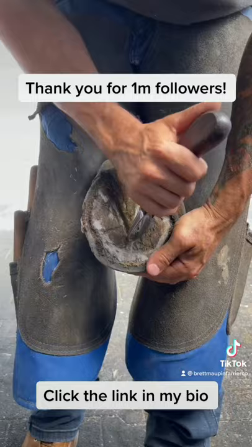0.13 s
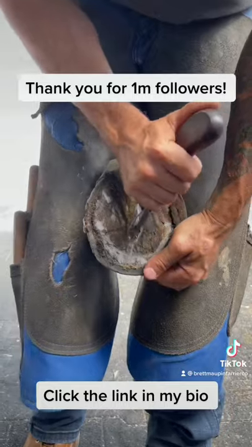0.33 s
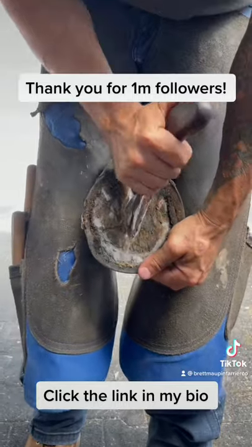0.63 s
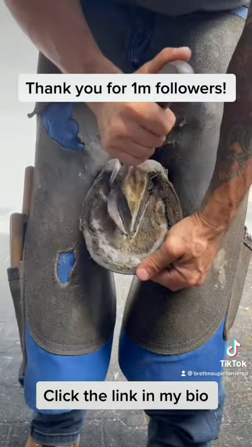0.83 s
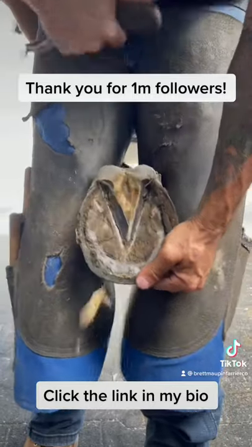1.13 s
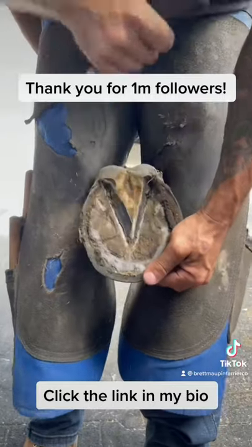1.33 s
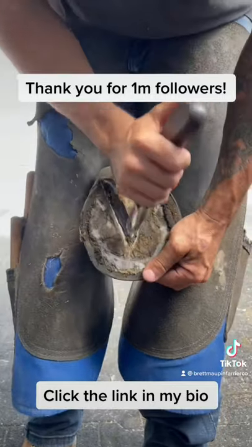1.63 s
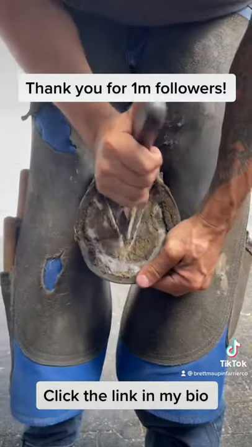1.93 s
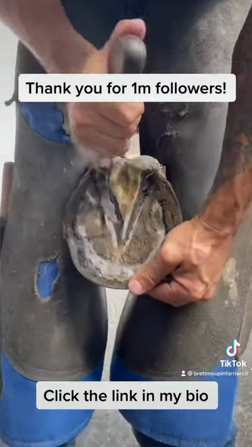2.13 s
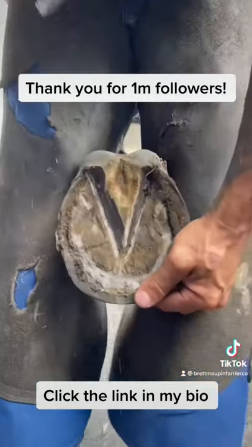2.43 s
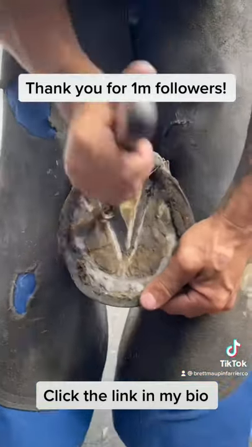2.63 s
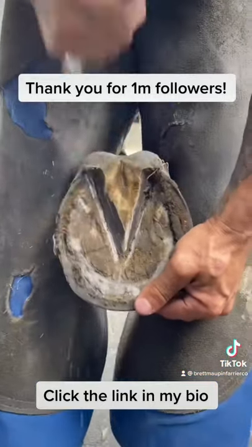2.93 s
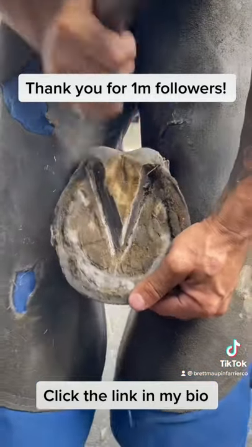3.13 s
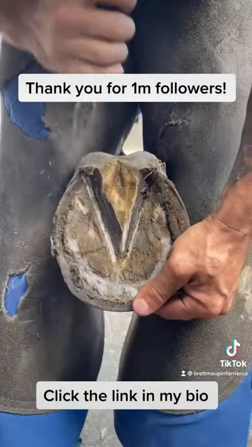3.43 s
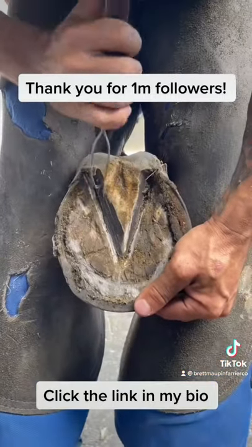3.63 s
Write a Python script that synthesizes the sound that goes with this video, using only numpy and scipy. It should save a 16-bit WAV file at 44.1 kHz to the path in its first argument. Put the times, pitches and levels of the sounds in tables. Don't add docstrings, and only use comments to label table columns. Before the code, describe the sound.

A hoof knife scrapes lightly, then two loud snaps, a pause with a few taps and cloth rustle, then more strokes ending in cracks, over a low hum; close, dry stereo microphone.

```python
import sys
import numpy as np
from scipy import signal
from scipy.fft import rfft, irfft, next_fast_len
from scipy.io import wavfile

SR = 44100
rng = np.random.default_rng(int(sys.argv[2]) if len(sys.argv) > 2 else 0)


def persist_wave(psi):
    counts = np.round(np.clip(psi, -1, 1) * 32767).astype(np.int16)
    wavfile.write(sys.argv[1], SR, np.atleast_2d(counts).T)


def invert_db(x):
    u = np.asarray(x, float) / 20
    return 10 ** u


N = 166257

# (time [s], frequency [Hz], level [dB])
MOTOR_TONE = [(0.0, 68, -53), (0.05, 69.5, -50), (0.72, 70.7, -39), (0.85, 69.9, -47.5),
              (1.12, 72.7, -47.5), (1.5, 70.76, -42.5), (2.34, 70.6, -43.5), (2.47, 71.1, -41),
              (2.48, 71.3, -49), (2.71, 70.45, -38.5), (2.89, 73.06, -62), (3.07, 72.2, -36),
              (3.38, 70.65, -50), (3.59, 71.05, -43.5), (3.77, 67.9, -43)]
# (frequency [Hz], width [Hz], level [dB])
MOTOR_BANDS = [(46, 27, -54.5), (78.4, 7.4, -54.5), (95.3, 7.6, -50), (121.4, 4.2, -55.5), (188.5, 7, -58),
               (285, 4.8, -63), (383.4, 8.3, -70.5)]
# (frequency [Hz], density [dB])
FLOOR_SPECTRUM = [(15, -32), (25, -7.5), (54, -1.5), (86, -2), (196, -12), (237, -14), (4000, -38.5),
                  (5200, -41), (8800, -120)]
# (frequency [Hz], density [dB])
HISS_SPECTRUM = [(2000, -2.5), (4000, -7.5), (7000, -2), (10500, 3.5), (11500, -3.5), (12500, -47),
                 (14000, -4)]
FLOOR_DB, HISS_DB = -46.5, -64.5
APART_DB, APART_HZ = -68.5, (162, 1410)

# (start [s], length [s], level [dB])
RUSTLES = [(0.644, 0.086, -53.5), (0.79, 0.069, -53), (0.876, 0.11, -48.5), (1.043, 0.039, -55),
           (1.149, 0.12, -52.5), (1.333, 0.15, -57), (1.829, 0.023, -58), (2.13, 0.081, -49.5),
           (2.237, 0.053, -52), (2.755, 0.027, -55), (2.903, 0.19, -55), (3.162, 0.092, -59.5),
           (3.222, 0.17, -58), (3.49, 0.072, -54)]
# (frequency [Hz], density [dB])
CLOTH_SPECTRUM = [(600, 3), (2000, -1.5), (5000, -2.5), (8000, 5), (10500, 7.5), (12000, -1), (13500, -20),
                  (16000, -46)]
RUSTLE_RISE_S, RUSTLE_FALL_S = 0.035, 0.036

# (time [s], peak level [dB], pitch [Hz], decay [cycles])
TAPS = [(.774, -29.5, 680, 15), (1.0156, -24.5, 1150, 25), (1.017, -38, 546, 8.9), (1.0708, -34.5, 1970, 5),
        (1.079, -31, 448, 13.3), (1.36, -37.5, 439, 14), (1.735, -42, 307, 10), (1.046, -34, 700, 10),
        (2.2438, -30, 702, 21), (2.2442, -27, 1127, 23), (2.255, -32, 620, 14), (2.28, -38, 960, 16),
        (2.284, -35, 375, 6.4), (2.303, -39, 766, 22), (2.633, -28, 337, 14), (2.6327, -29, 420, 13),
        (2.685, -24, 1360, 4.8), (2.764, -32.5, 336, 4.9), (2.819, -26, 604.6, 1.9),
        (3.055, -27.5, 433, 4.1), (3.191, -26, 674, 6.3)]
TAP_SOFTNESS = 1.82

# (time [s], frequency [Hz], level [dB], t60 [s])
BLADE_MODES = [
    (.15, 10200, -54.5, 0.085),
    (1.066, 2350, -56.5, 0.21),
    (1.075, 5160, -62.5, 0.1),
    (1.41, 4700, -65, 0.29),
    (1.41, 12950, -59, 0.31),
    (2.29, 5460, -62, .12),
    (2.75, 10470, -46, 0.1),
    (3.148, 5190, -49.5, 0.19),
    (3.139, 10000, -31, 0.031),
    (3.15, 11100, -64, 0.13),
]
SING_RISE_S = 0.012

# (time [s], peak level [dB], pitch [Hz], decay [cycles])
NICKS = [(0.2027, -34.5, 2700, 38), (.2611, -50, 2800, 50), (0.31, -40, 2600, 56), (0.327, -51, 2450, 36),
         (0.3724, -57, 2220, 40), (0.6263, -55, 2540, 40), (.7071, -54, 2170, 55), (0.7728, -26, 2350, 17),
         (.9942, -24.5, 5760, 59), (1.8688, -39, 2270, 40), (2.033, -35, 2100, 29),
         (2.2446, -21.5, 5700, 38), (2.629, -26, 6040, 97), (2.6301, -25, 1680, 16),
         (2.664, -44, 7160, 100), (3.053, -39, 2790, 45), (3.145, -25.5, 4020, 50)]
NICK_PARTNER = 1.07

# (time [s], peak level [dB], crack t60 [s], low part [dB])
FLICKS = [(0.414, -32, 0.09, -6), (0.7733, -11.5, 0.011, -16), (0.994, -11.5, 0.023, -10),
          (1.0153, -13.5, 0.0049, 5.5), (1.544, -25, 0.027, 4.5), (1.6511, -35, 0.029, -3),
          (1.8373, -32.5, .03, 0), (2.0333, -32, 0.029, -3), (2.1093, -24, 0.057, -3),
          (2.2427, -14, 0.042, -2), (2.6289, -17.5, 0.012, 8.5), (2.745, -13, 0.04, -4),
          (3.053, -22.5, 0.031, 9.5), (3.144, -9.5, 0.019, -7), (3.702, -31.5, 0.028, -22)]
# (frequency [Hz], density [dB])
CRACK_SPECTRUM = [(300, 0.5), (1000, -9), (2300, -5), (4000, -11.5), (6000, -10.5), (8000, -6.5),
                  (10500, -3.5), (15000, -18)]
CRACK_SPLIT_HZ, CRACK_SPREAD_DB = 4700, 2.2
TAIL_DB, TAIL_T60_S = -16.5, 0.2

# (start [s], length [s], level [dB], rise [s])
DRAGS = [(0, 0.0036, -48, 0.00097), (0.192, 0.037, -51.5, 0.0057), (0.234, 0.081, -53.5, 0.028),
         (0.31, 0.096, -59.5, 0.0046), (0.562, 0.084, -53.5, 0.071), (0.691, 0.037, -47.5, 0.012),
         (0.731, 0.023, -52, 0.018), (0.752, 0.025, -30.5, 0.03), (0.787, 0.011, -47.5, 0.0049),
         (1.002, 0.0092, -31, 0.015), (1.011, 0.011, -47.5, .004), (1.859, 0.096, -48.5, 0.008),
         (1.951, 0.043, -45, 0.019), (2, 0.031, -47, .01), (2.027, 0.02, -42, 0.0028),
         (2.046, 0.045, -37.5, 0.01), (2.092, 0.049, -52, 0.0045), (2.19, 0.056, -49, 0.052),
         (2.224, 0.022, -43.5, 0.016), (2.666, 0.008, -39.5, 0.01), (2.676, 0.021, -38, 0.0026),
         (2.697, 0.0045, -40.5, 0.0067), (2.707, 0.024, -46, 0.0043), (2.734, 0.011, -35, 0.013),
         (2.756, 0.0074, -55, 0.0044), (3.077, 0.018, -34, 0.012), (3.094, 0.016, -33.5, 0.0095),
         (3.116, 0.018, -42.5, .005), (3.139, 0.0046, -30.5, 0.0028)]
# (frequency [Hz], width [Hz], level [dB])
CONTACT_MODES = [(750, 500, -3), (1300, 600, -5.5), (2450, 800, 1), (3900, 600, 1.5), (5600, 400, -7),
                 (7100, 700, -1), (10000, 800, 2), (11400, 1100, -5)]
# (start [s], horn pitch [Hz], blade pitch [Hz], blade level [dB], dull grit level [dB])
GRIPS = [
    (0, 2480, 4050, -5, -6),
    (.5, 2450, 3925, -0.5, 4),
    (.68, 2310, 4080, -1.5, -0.5),
    (.9, 2380, 3900, -3, 3.5),
    (1.8, 2220, 3700, 0, -1),
    (2.022, 2193, 3920, 1.5, -1),
    (2.16, 2500, 3830, 3.5, 1.5),
    (2.6, 2250, 3830, 2.5, 2),
    (2.725, 2450, 4100, 0.5, 1),
    (3.0, 2440, 3922, 0, -2),
]
GRAINS_PER_S, GRAIN_SPREAD_DB = 7000, 3.3
STUTTER_DB, SHIFT_DB = 2.0, 2.5
DRAG_FALL_S, HORN_WIDE_DB = 0.0063, -10.5

# (frequency [Hz], phase [rad])
PORT_PHASE = [(20, 0), (900, .15), (1900, -.1), (2550, -.5), (3800, -.75), (4350, -1.25), (4650, -2),
              (5200, -5.1), (5600, -6.2), (6000, -6.35), (8800, -9.4), (9500, -9.65), (12200, -12.57),
              (13700, -12.57), (15000, -15.7)]
# (frequency [Hz], level [dB])
MASKING = [(250, -40), (1200, -24), (2000, -16), (4900, -6.5), (6000, -13), (9000, -9.5), (13000, -13)]
FAINT_HZ, FAINT_DB, RAGGED_DB, SUDDEN_DB = 11500, -99, 3.0, 10
NEAR_DB, NEAR_T60_S, NEAR_HZ = -15, 0.05, (330, 9500)
CASE_HZ, CASE_WIDTH_HZ, CASE_DB = 4900, 500, -5
LOW_CUT_HZ, TOP_HZ = 39, 12100


def rms_one(x):
    return x / np.sqrt(np.mean(x ** 2) + 1e-20)


def drift(rate):
    r = np.exp(-2 * np.pi * rate / SR)
    noise = rng.standard_normal(N + SR)
    return rms_one(signal.lfilter([1], [1, -2 * r, r * r], noise)[SR:])


def coloured(x, spectrum):
    hz, db = np.transpose(spectrum)
    f = np.maximum(np.arange(N // 2 + 1) * SR / N, 1)
    gain_db = np.interp(np.log(f), np.log(hz), db, left=-60)
    return rms_one(irfft(rfft(x) * invert_db(gain_db), N))


def band(x, order, edges_hz):
    return signal.sosfilt(signal.butter(order, edges_hz, "band", fs=SR, output="sos"), x)


def resonance(x, hz, width_hz):
    r = np.exp(-np.pi * width_hz / SR)
    zeros = np.array([1, 0, -1]) * (1 - r * r) / 2
    return signal.lfilter(zeros, [1, -2 * r * np.cos(2 * np.pi * hz / SR), r * r], x)


def ring(clicks, hz, t60):
    r = invert_db(-60 / (t60 * SR))
    w = 2 * np.pi * hz / SR
    return signal.lfilter([0, np.sin(w)], [1, -2 * r * np.cos(w), r * r], clicks + 1e-18)


def swell(start, length, rise, fall):
    t = np.arange(N) / SR - start
    attack = np.sin(np.pi / 2 * np.clip(t / rise, 0, 1)) ** 2
    return attack * np.exp(-np.maximum(t - length, 0) / fall)


def grains(rate, spread_db):
    sizes = invert_db(spread_db * np.minimum(rng.exponential(1, N), 5)) * rng.choice([-1, 1], N)
    return rms_one(sizes * (rng.random(N) < rate / SR))


def shed():
    s, hz, db = np.transpose(MOTOR_TONE)
    t = np.arange(N) / SR
    phase = 2 * np.pi * np.cumsum(np.interp(t, s, hz) + 0.65 * drift(3.8)) / SR
    out = np.sqrt(2) * invert_db(np.interp(t, s, db) - 0.5) * np.sin(phase)
    for hz, width_hz, db in MOTOR_BANDS:
        noise = rng.standard_normal(N + SR)
        hum = resonance(resonance(noise, hz, width_hz), hz, 2 * width_hz)
        out += invert_db(db) * rms_one(hum[SR:])
    room_floor = coloured(rng.standard_normal(N), FLOOR_SPECTRUM + [(9000, -49.5)])
    hiss = coloured(rng.standard_normal(N), HISS_SPECTRUM)
    return out + invert_db(FLOOR_DB) * room_floor + invert_db(HISS_DB + drift(0.43)) * hiss


def rustle():
    level = sum(invert_db(db) * swell(s, length, RUSTLE_RISE_S, RUSTLE_FALL_S) for s, length, db in RUSTLES)
    cloth = coloured(grains(20000, 3.65), CLOTH_SPECTRUM)
    patches = np.zeros(N)
    for k, hz in enumerate(np.geomspace(900, 12000, 9)):
        patches += invert_db(3.3 * drift(10.2)) * resonance(cloth, hz, hz / 3) * (-1) ** k
    return level * rms_one(patches)


def taps():
    out = np.zeros(N + SR)
    for s, db, hz, cycles in TAPS:
        click = invert_db(db - 5.0) * signal.unit_impulse(SR // 10)
        contact = signal.butter(2, TAP_SOFTNESS * hz, fs=SR, output="sos")
        click = signal.sosfilt(contact, click + 1e-18)
        for ratio, rel_db in [(1, 3), (1.3, -4.5), (2.3, -3)]:
            out[int(s * SR):][:len(click)] += invert_db(rel_db) * ring(click, hz * ratio, cycles / hz / ratio)
    return out[:N]


def blade():
    t = np.arange(N) / SR
    out = np.zeros(N)
    for s, hz, db, t60 in BLADE_MODES:
        level = invert_db(db) * swell(s, SING_RISE_S, SING_RISE_S, t60 / np.log(1000))
        out += level * np.sin(2 * np.pi * hz * t)
    return out


def nicks():
    out = np.zeros(N + SR)
    for s, db, hz, cycles in NICKS:
        click = resonance(invert_db(db - 6) * signal.unit_impulse(SR // 10) + 1e-18, hz, hz / 2)
        pair = ring(click, hz, cycles / hz) + ring(click, hz * NICK_PARTNER, cycles / hz)
        out[int(s * SR):][:len(click)] += pair
    return out[:N]


def flicks():
    both = np.array([coloured(grains(15000, CRACK_SPREAD_DB), CRACK_SPECTRUM),
                     coloured(rng.standard_normal(N), CRACK_SPECTRUM)])
    low = signal.lfilter(*signal.butter(1, CRACK_SPLIT_HZ, fs=SR), both)
    tail_level = invert_db(TAIL_DB)
    out = np.zeros(N)
    for s, db, t60, low_db in FLICKS:
        crack, tail = both + (invert_db(low_db) - 1) * low
        crack = crack * swell(s, 0.0017, 0.00091, max(t60, 0.003) / np.log(1000))
        tail = tail * tail_level * swell(s, 0.001, 0.001, TAIL_T60_S / np.log(1000))
        out += invert_db(db - 16.5) * (crack + tail)
    return out


def drags():
    strokes = sum(invert_db(db) * swell(s, length, max(rise, 0.001), DRAG_FALL_S) for s, length, db, rise in DRAGS)
    force = invert_db(STUTTER_DB * drift(80)) * strokes
    slips = grains(GRAINS_PER_S, GRAIN_SPREAD_DB)
    wander = [invert_db(SHIFT_DB * drift(17.0)) for _ in CONTACT_MODES]
    cuts = [int(row[0] * SR) for row in GRIPS] + [N]
    body = np.zeros(N)
    for a, b, (_, horn_hz, blade_hz, blade_db, grit_db) in zip(cuts, cuts[1:], GRIPS):
        new_hz = {2: horn_hz, 3: blade_hz}
        extra_db = {0: grit_db, 1: grit_db, 3: blade_db}
        for k, (hz, width_hz, db) in enumerate(CONTACT_MODES):
            hz = new_hz.get(k, hz)
            db = db + extra_db.get(k, 0)
            mode = resonance(resonance(slips[a:b], hz, width_hz), hz, 2 * width_hz)
            body[a:b] += invert_db(db) * wander[k][a:b] * mode * (-1) ** k
    return force * (rms_one(body) + invert_db(HORN_WIDE_DB) * coloured(slips, CRACK_SPECTRUM))


def scene():
    front = shed() + rustle() + taps() + blade() + nicks() + flicks() + drags()
    apart = rms_one(band(rng.standard_normal(N), 2, APART_HZ))
    return front + invert_db(APART_DB) * apart * np.array([[1], [-1]])


def nearby(x):
    t = np.arange(SR // 10) / SR
    echoes = rng.standard_normal((2, len(t))) * invert_db(-60 * t / NEAR_T60_S)
    echoes = echoes / np.sqrt((echoes ** 2).sum(1, keepdims=True))
    wet = signal.fftconvolve(x, echoes, axes=1)[:, :N]
    return invert_db(NEAR_DB) * band(wet, 2, NEAR_HZ)


def drop_masked(x):
    mid_side = np.array([x[0] + x[1], x[0] - x[1]]) / 2
    hz, _, z = signal.stft(mid_side, SR, nperseg=2048)
    power = (abs(z[:, :1024]) ** 2).reshape(2, 64, 16, -1).mean(2)
    mid_hz = hz[:1024].reshape(64, 16).mean(1)[:, None]
    judged = power * invert_db(2 * RAGGED_DB * rng.standard_normal(power.shape))
    threshold = invert_db(2 * np.interp(mid_hz, *np.transpose(MASKING)))
    keep = judged > power[::-1] * threshold
    loud = power[:, 3:].sum((0, 1))
    keep |= loud > invert_db(2 * SUDDEN_DB) * np.roll(loud, 2)
    keep &= (judged > invert_db(2 * FAINT_DB)) | (mid_hz < FAINT_HZ)
    z[:, :1024] *= np.repeat(keep | (mid_hz <= MASKING[0][0]), 16, axis=1)
    mid, side = signal.istft(z, SR, nperseg=2048)[1][:, :N]
    return np.array([mid + side, mid - side])


def top_cut(x):
    return signal.sosfilt(signal.butter(12, 15710, fs=SR, output="sos"), x)


def record(dry):
    size = next_fast_len(N + 4096)
    hz, phase = np.transpose(PORT_PHASE)
    half = np.interp(np.arange(size // 2 + 1) * SR / size, hz, phase) / 2
    dry = dry + invert_db(CASE_DB) * resonance(dry, CASE_HZ, CASE_WIDTH_HZ)
    turned = rfft(dry, size) * np.exp(1j * half * np.array([[-1], [1]]))
    x = irfft(turned, size)[:, :N] + nearby(dry)
    x = band(x, 3, (LOW_CUT_HZ, TOP_HZ))
    return top_cut(drop_masked(x))


dry = scene()
out = record(dry)
persist_wave(out)
```